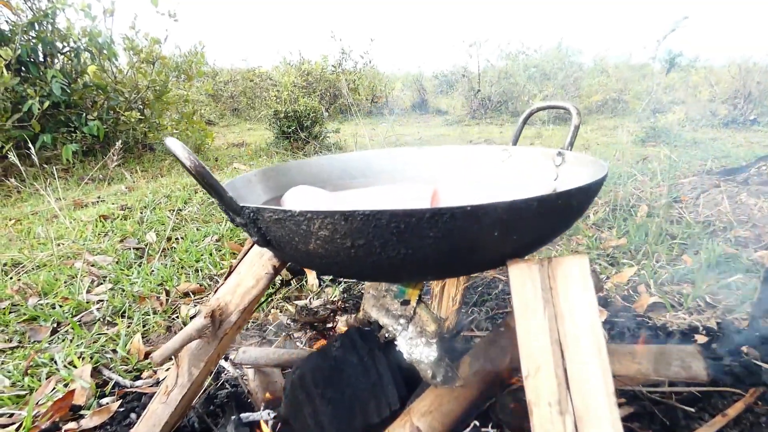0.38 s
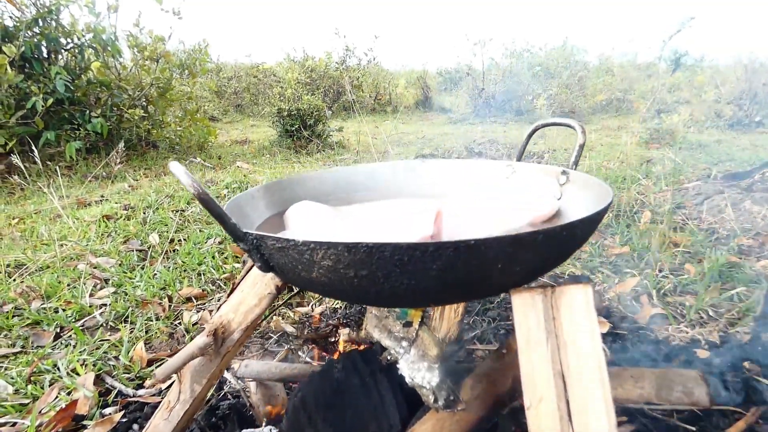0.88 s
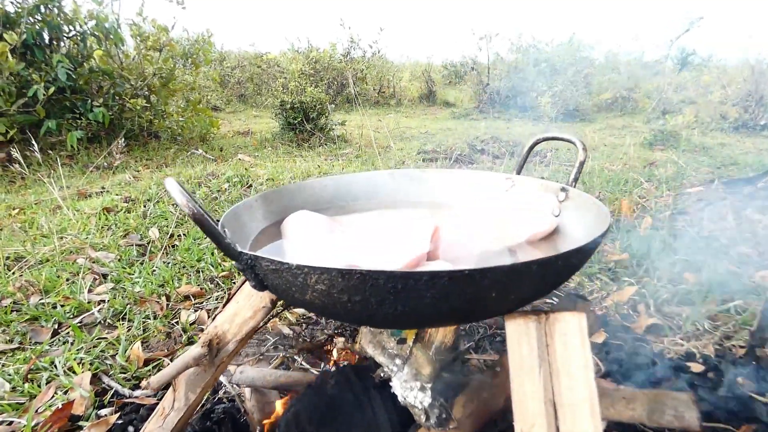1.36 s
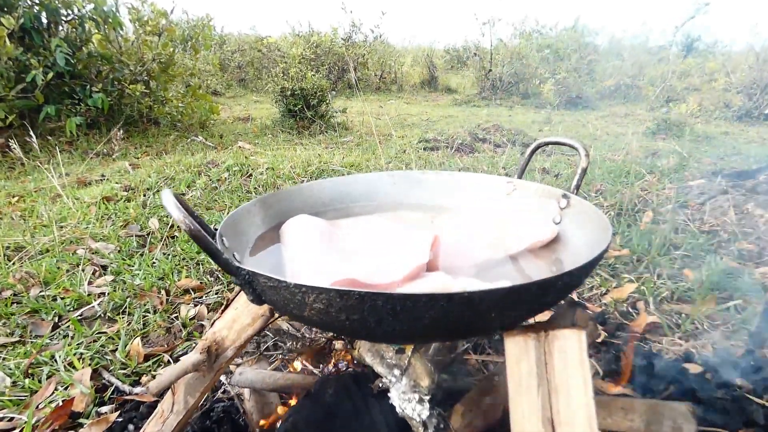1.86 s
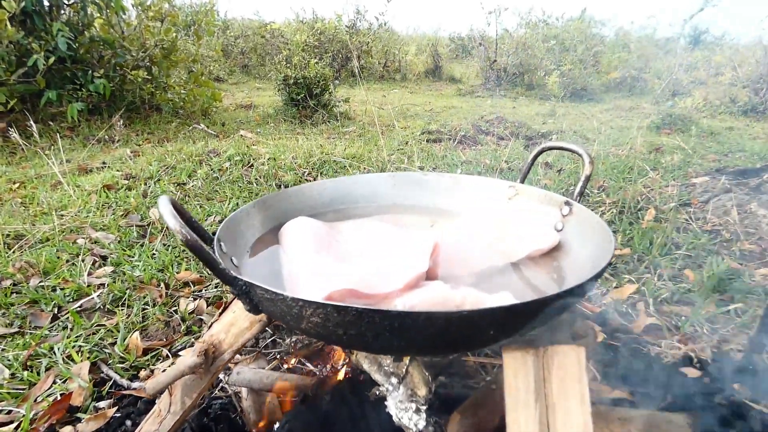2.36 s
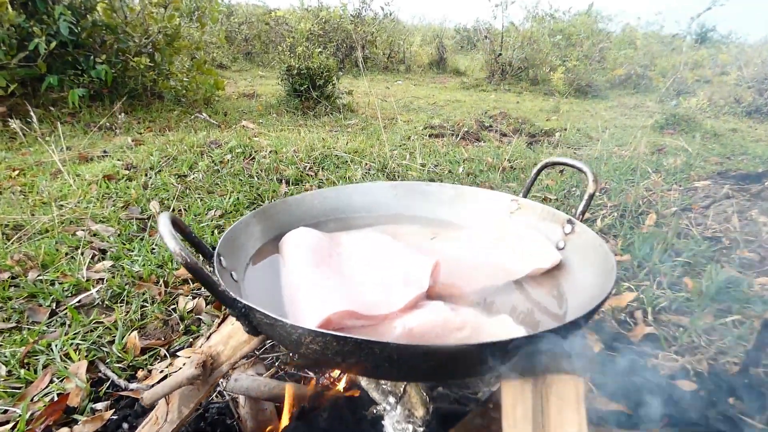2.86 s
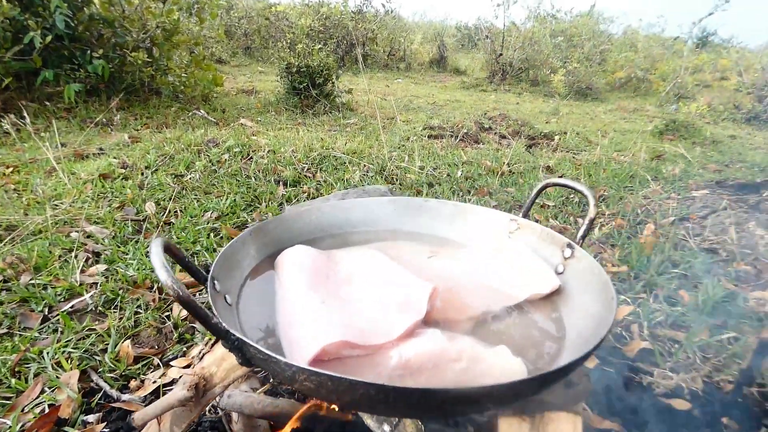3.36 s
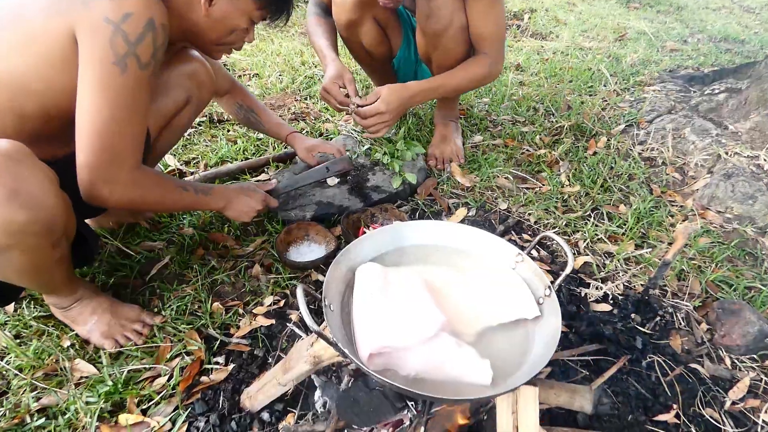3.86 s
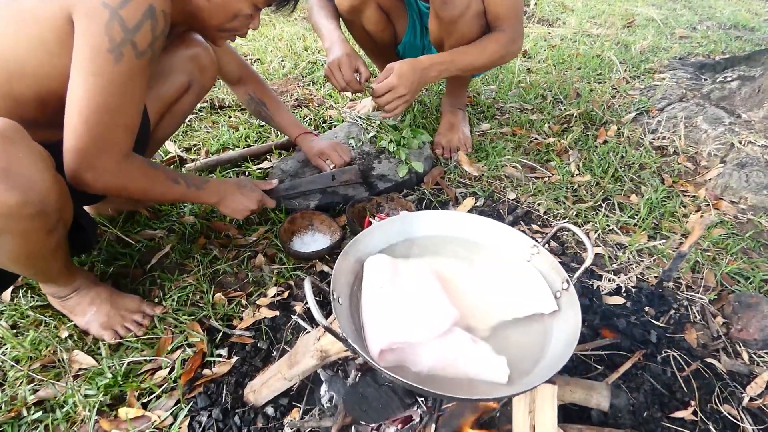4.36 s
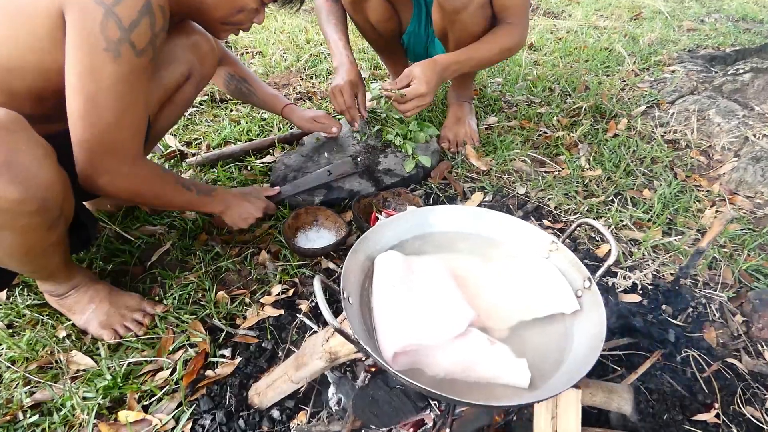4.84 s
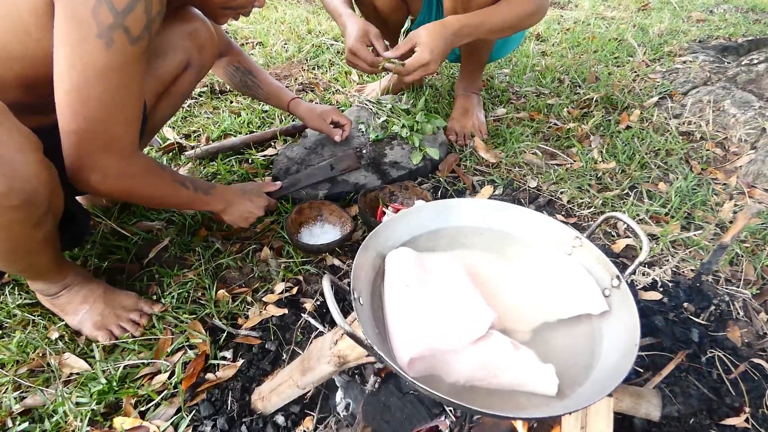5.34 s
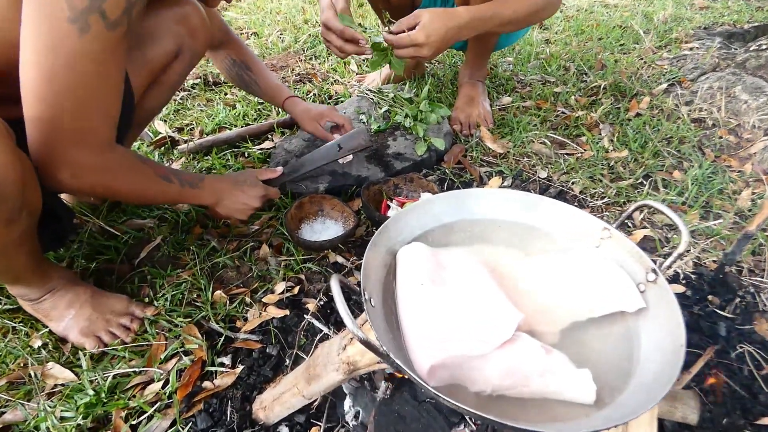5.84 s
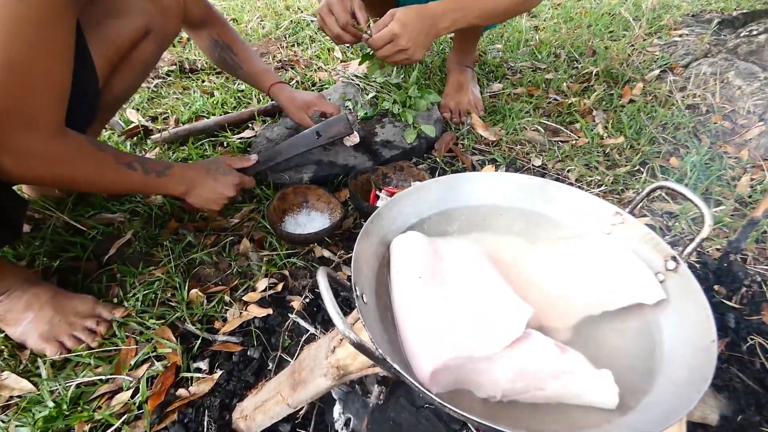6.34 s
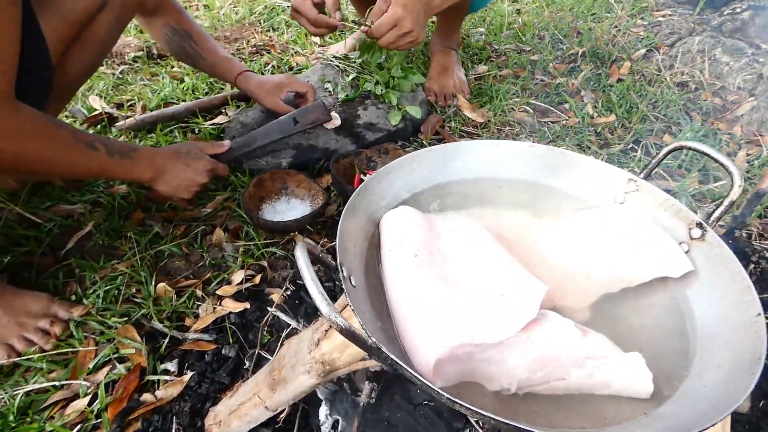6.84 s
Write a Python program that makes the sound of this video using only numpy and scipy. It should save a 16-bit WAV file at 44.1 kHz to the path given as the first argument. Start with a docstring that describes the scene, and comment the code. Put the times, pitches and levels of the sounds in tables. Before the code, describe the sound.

From 0 to 3.5 s a wood fire hisses softly outdoors, sprinkled with tiny crackles over low rumble. Thin bright snaps come at 0.6 and 0.7 s, a hollow knock at 1.3 s, the strongest woody crack at 1.55 s, another knock at 1.8 s, then small clusters around 2.4 and 3.1 s. A far animal chirrs faintly from 2.5 s. Complete silence lasts from 3.54 to 3.81 s. Then, close and dry, a knife scrapes stone with a faint rising squeal at 3.9 s and gritty strokes to 4.65 s. A hard chop lands at 4.85 s, beside a tiny bird note; a stem squeaks and snaps at 5.1 s. A longer rasp leads to the loudest blow at 5.54 s, its blade ringing briefly; the background ducks, then recovers. Lighter scrapes and ticks continue until about 7.2 s, with throbbing chirrs, a faint distant moan at 6 s and soft blips from 6.3 s.

```python
"""Camp fire, then a knife on stone

A wood fire hisses and pops under a pan in an open field, over a low outdoor rumble and a far chirring animal.
After a short silent cut, closer to a flat stone, a heavy knife is dragged over it, snaps through stems and
once strikes it so that the blade rings. Hiss is shaped noise, knocks and ringing are decaying modes, snaps
are noise bursts, and strokes are grit noise driving resonances; a limiter ducks after loud peaks."""
import sys
import numpy as np
from scipy import signal
from scipy.io import wavfile
from scipy.ndimage import uniform_filter1d, minimum_filter1d

SR = 44100
rng = np.random.default_rng(int(sys.argv[2]) if len(sys.argv) > 2 else 0)


def nominal_scale(level):
    """Amplitude ratio for a level in decibels (scalar or array-like)."""
    x = np.asarray(level, float) / 20
    return 10 ** x


def log_audio(samples):
    """Write samples as a 16-bit WAV file to the path given in sys.argv[1]."""
    # one column per channel
    frames = np.atleast_2d(samples).T
    # limit to full scale, then quantise
    limited = np.clip(frames, -1, 1)
    pcm = np.round(limited * 32767).astype(np.int16)
    wavfile.write(sys.argv[1], SR, pcm)


N = 317961

# silence between the two shots: start_s, end_s
CUT = (3.541, 3.811)


def evened(x):
    """Normalisation: scales a signal to rms 1."""
    return x / np.sqrt(np.mean(x ** 2) + 1e-20)


def read(points, hz):
    """Spectral interpolation: reads a curve on a log-frequency axis."""
    f, value = np.transpose(points)
    return np.interp(np.log(hz + 1), np.log(f + 1), value)


def add(mix, s, sound, pan_db):
    """Intensity stereo: a level difference (left minus right) places a mono sound."""
    part = mix[:, round(s * SR):][:, :len(sound)]
    part += nominal_scale(np.array([[pan_db], [-pan_db]]) / 2) * sound[:part.shape[1]]


def resonate(x, hz, width):
    """Heterodyning: shifts the curve hz to zero, smooths and shifts back, a resonance of gain 1."""
    turn = np.exp(2j * np.pi * np.cumsum(hz * np.ones(len(x))) / SR)
    r = np.exp(-np.pi * abs(width) / SR)
    return 2 * (turn * signal.lfilter([1 - r], [1, -r], x / turn)).real


def ring(modes, seconds, rise):
    """Modal decay: dying sines start nearly together after a blow that builds up over rise seconds, peak 1."""
    t = np.arange(round(seconds * SR)) / SR
    x = 0
    for hz, db, t60 in modes:
        x = x + nominal_scale(db - 60 * t / t60) * np.sin(2 * np.pi * (hz * t + 0.36 * rng.random()))
    x *= 1 - np.exp(-t / rise)
    return x / abs(x).max()


def crack(hz, t60, wide_db, tail_db):
    """Impulsive fracture: a noise snap near hz over a wide band, with fainter scatter from the ground, peak 1."""
    t, noise = np.arange(4000) / SR, rng.standard_normal(4000)
    decay = nominal_scale(-60 * t / max(t60, .004)) + nominal_scale(tail_db - 60 * t / 0.23)
    shape = (1 - np.exp(-t / 0.0001)) * decay
    narrow = resonate(resonate(noise, hz, .4 * hz), hz, .4 * hz)
    wide = resonate(resonate(noise, 4700, 17000), 6300, 16000)
    wide = signal.lfilter([1, -1], [1, -.85], wide)  # thin below 1 kHz
    x = shape * (evened(narrow) + nominal_scale(wide_db) * evened(wide))
    return x / abs(x).max()


def nearness(hz, centre_hz, spread):
    """Selective excitation: how strongly a contact that favours centre_hz drives a mode at hz."""
    return np.exp(-.5 * (np.log(hz / centre_hz) / spread) ** 2)


def sweep(start, end, from_hz, to_hz):
    """Linear glide: the times of a short sound and its straight course in pitch."""
    t = np.arange(start, end, 1 / SR)
    return t, np.linspace(from_hz, to_hz, len(t))


def air():
    """Stochastic spectra: random short-time spectra with drifting patches make hiss and lumpy rumble."""
    # relative hiss spectrum of each shot: freq_hz, density_db
    fire_hiss = [(290, -14), (500, -24.5), (631, -1.5), (784, -3.5), (974, -15.5), (1180, -5.5),
                 (1300, -3.5), (1870, -7), (2770, -3.5), (3700, -6.5), (4800, -3), (7420, -9.5),
                 (9490, -6.5), (11300, -6.5), (12300, -14), (14900, -17.5), (16000, -34)]
    stone_hiss = [(290, -36), (500, -10.5), (708, -7), (868, -11.5), (1130, -15), (1440, -5), (1740, -15),
                  (2460, -12), (2770, -15), (3490, -14), (5880, -15.5), (7420, -19.5), (10200, -15),
                  (11400, -11.5), (12300, -23.5), (15000, -29.5), (16000, -36.5)]
    # relative spectrum of the field rumble: freq_hz, density_db
    rumble = [(15, -84), (25, -73.5), (97, -3.5), (152, -2.5), (295, -12.5), (324, -8.5), (620, -19),
              (746, -46.5), (857, -26), (1000, -21), (1300, -50), (2200, -120)]
    # likeness of the two microphones, limited to -1..1: freq_hz, correlation
    likeness = [(60, -0.44), (150, 1), (380, 0.22), (950, -0.37), (2380, 0.61), (5980, 0.87), (15000, 0.48)]
    # balance of the microphones: freq_hz, left_minus_right_db
    balance = [(60, -4.5), (240, 0), (950, -2.5), (3770, 1.5), (15000, -1.5)]
    # each shot: start_s, hiss_db, hiss_drift_db_per_s, rumble_db, rumble_drift_db_per_s
    shots = [(0, -45, -1.39, -47.5, -0.88), (3.811, -49.5, 0.5, -45, -1.13)]
    # the rumble swells once: centre_s, half_width_s, rise_db
    gust = (4.23, 0.21, 2.9)
    frames, hz = N // 256 + 5, np.fft.rfftfreq(1024, 1 / SR)
    t = np.arange(frames) * 256 / SR
    a, b, c, d, patches = rng.standard_normal((frames, 513, 5)).T
    patches = uniform_filter1d(uniform_filter1d(patches, size=10, axis=0), size=12, axis=1)
    patches = evened(patches)
    lumps = evened(uniform_filter1d(rng.standard_normal(frames), size=5))

    second = t >= CUT[0] + .1  # the shots change inside the silence
    top = np.where(second, nominal_scale(read(stone_hiss, hz))[:, None], nominal_scale(read(fire_hiss, hz))[:, None])
    bottom = nominal_scale(read(rumble, hz))[:, None]
    start, hiss_db, hiss_drift, rumble_db, rumble_drift = np.array(shots)[second * 1].T
    hiss_db = hiss_db + hiss_drift * (t - start)
    rumble_db = rumble_db + rumble_drift * (t - start) + lumps
    rumble_db = rumble_db + gust[2] * np.exp(-((t - gust[0]) / gust[1]) ** 2)
    field = nominal_scale(hiss_db) * top / np.linalg.norm(top, axis=0)
    field = field + nominal_scale(rumble_db) * bottom / np.linalg.norm(bottom, axis=0)

    same = np.clip(read(likeness, hz), -1, 1)[:, None]
    left = a + 1j * b
    right = same * left + np.sqrt(1 - same ** 2) * (c + 1j * d)
    z = np.array([left, right]) * field * nominal_scale(1.7 * patches)
    z *= nominal_scale(np.array([.5, -.5])[:, None, None] * read(balance, hz)[:, None])
    unit = np.sqrt(1536 / 4) / 20  # level scale of the short-time spectrum
    return signal.istft(z * unit, nperseg=1024, noverlap=768)[1][:, :N]


def chirr():
    """Amplitude modulation: a far animal's fuzzy narrow note throbs unevenly, different at each microphone."""
    # bouts of chirring, levels before a common gain: start_s, end_s, level_db, pitch_hz
    bouts = [(2.5, 2.797, -67.5, 1350), (3.007, 3.503, -68.5, 1297), (3.754, 4.495, -63, 1443),
             (4.901, 5.605, -66, 1476), (5.81, 6.207, -58.5, 1407), (6.33, 6.6, -61, 1410),
             (6.813, 7.144, -59, 1430)]
    fade_s = 0.075
    t = np.arange(N) / SR
    start, end, db, pitch_hz = np.transpose(bouts)
    level = 0
    for a, b, d in zip(start, end, db):
        level = level + nominal_scale(d) * np.clip(np.minimum(t - a, b - t) / fade_s + .5, 0, 1)
    wander = evened(uniform_filter1d(rng.standard_normal(N), size=3000))
    hz = np.interp(t, (start + end) / 2, pitch_hz) * (1 + 0.0059 * wander)
    throb_hz = 28 * (1 + 0.35 * wander)
    throb = 0.94 + np.cos(np.pi * np.cumsum(throb_hz) / SR) ** 2
    noises = rng.standard_normal((2, N))
    a, b = (evened(throb * resonate(resonate(n, hz, 110), hz, 130)) for n in noises)
    return nominal_scale(2.0) * level * np.array([a + 0.16 * b, a - 1.43 * b])


def moan(mix):
    """Band-filtered noise: a faint dull double band swells briefly in the distance."""
    # one call, pitches of the upper band: start_s, end_s, level_db, from_hz, to_hz
    call = (6, 6.37, -56.5, 821, 955)
    start, end, db, from_hz, to_hz = call
    t, hz = sweep(start, end, from_hz, to_hz)
    noise = rng.standard_normal(20000)[:len(t)]
    upper, lower = (evened(resonate(resonate(noise, f, 91), f, 91)) for f in (hz, 0.607 * hz))
    add(mix, start, nominal_scale(db) * signal.windows.tukey(len(t), .3) * (upper + 0.7 * lower), 0)


def blips(mix):
    """Superposition: each distant blip is two soft tones under one short swell."""
    # onset and level of the upper tone: start_s, level_db
    blip_times = [(6.325, -42), (6.603, -41), (6.641, -43), (6.76, -41), (6.845, -52)]
    high_hz, low_hz, low_db, length_s = 1470, 1000, -5.5, 0.021  # low_db is relative to the upper tone
    t = np.arange(0, length_s, 1 / SR)
    for (s, db), (a, b) in zip(blip_times, rng.random((len(blip_times), 2))):
        high = np.sin(2 * np.pi * (high_hz * t + a))
        low = nominal_scale(low_db) * np.sin(2 * np.pi * (low_hz * t + b))
        add(mix, s, nominal_scale(db) * np.hanning(len(t)) * (high + low), 0)


def bird(mix):
    """Frequency modulation: one short whistle rises quickly and levels off."""
    # one note, level before a 3 dB lift: start_s, end_s, level_db, from_hz, to_hz
    note = (4.808, 4.84, -49, 2450, 2950)
    start, end, db, from_hz, to_hz = note
    t = np.arange(start, end, 1 / SR)
    hz = to_hz + (from_hz - to_hz) * np.exp(-(t - start) / .009)
    swell = np.sin(np.pi * ((t - start) / (end - start)) ** 1.3) ** .5
    add(mix, start, nominal_scale(db + 3) * swell * np.sin(2 * np.pi * np.cumsum(hz) / SR), 0)


def log_knocks(mix):
    """Cavity modes: settling logs knock, and each knock favours the hollow modes near its own pitch."""
    # knocks: time_s, peak_db, favoured_hz, left_minus_right_db
    knocks = [(.772, -43.5, 440, 5), (.95, -43.5, 357, -15), (1.2803, -24, 640, -5),
              (1.5516, -14.5, 700, -5.5), (1.5545, -22, 471, 1), (1.587, -41, 340, -5),
              (1.601, -36, 667, -5), (1.7895, -32.5, 600, -4), (1.852, -41.5, 620, -8),
              (2.169, -41.5, 600, -3), (2.287, -40, 500, -8), (2.417, -36.5, 420, -9),
              (2.428, -45, 600, -9), (2.44, -39, 490, -5), (2.457, -40, 700, -6), (3.131, -35.5, 450, 2),
              (3.137, -36, 340, -20), (3.361, -42, 550, 2), (3.455, -42, 500, 0)]
    # modes of a hollow log: freq_hz, level_db, t60_s
    log_modes = [(340, -11, 0.017), (450, 2, 0.029), (564, 5.5, 0.024), (700, -3, 0.014), (850, 5.5, 0.025),
                 (946, 0.5, 0.027), (1150, -0.5, 0.035), (1750, 2.5, 0.03), (2150, -2.5, 0.034),
                 (2500, -4, 0.036), (2860, -8, 0.033)]
    for s, db, centre_hz, pan_db in knocks:
        modes = []
        for hz, d, t60 in log_modes:
            modes.append((hz, d + 20 * np.log10(0.22 + nearness(hz, centre_hz, 0.29)), t60))
        add(mix, s, nominal_scale(db) * ring(modes, .08, 0.0012), pan_db)


def fire_snaps(mix):
    """Brittle fracture: splitting fibre gives separate snaps over a random rain of faint crackles."""
    # snaps: time_s, peak_db, colour_hz, t60_s, wide_band_db
    pops = [(0.617, -17.5, 10700, 0.0046, 1), (0.7187, -25, 5900, 0.02, -4), (1.281, -42, 1870, 0.017, -1),
            (1.5516, -17.5, 4480, 0.025, -2), (1.562, -28, 5000, .012, 3), (1.567, -30, 5000, .012, 0),
            (1.574, -34, 4000, .012, 10), (2.288, -40, 2000, 0.018, 0), (2.419, -36.5, 1900, 0.03, 4),
            (2.431, -38, 2500, 0.03, 3), (2.442, -38, 2010, 0.044, 1), (2.459, -39, 2500, 0.03, -1),
            (3.1296, -35.5, 3840, .02, -5), (3.131, -40.5, 1600, 0.022, -9), (3.144, -42.5, 1500, .02, 0)]
    for s, db, hz, t60, wide_db in pops:
        add(mix, s, nominal_scale(db) * crack(hz, t60, wide_db, -18.0), -0.9)
    # crackles: colour in Hz, least peak in dB, mean number per second
    for hz, db, per_s in [(600, -58.5, 27), (4460, -51.0, 28), (10000, -46.0, 25)]:
        happens = rng.random(N) < per_s / SR
        size = nominal_scale(db + 2 * np.minimum(rng.exponential(1, N), 4)) * happens
        add(mix, 0, signal.oaconvolve(size, crack(hz, 0.036, -1, -26.5))[:N], 0)


def slab_thuds(mix):
    """Damped low-frequency impact: the slab rocks on the soil."""
    # thuds: time_s, peak_db
    rocks = [(4.321, -31), (4.851, -32.5), (4.951, -34), (5.154, -25), (5.36, -28), (5.541, -27),
             (5.8, -39), (6.771, -43)]
    for s, db in rocks:
        add(mix, s, nominal_scale(db) * crack(400, 0.014, -21.0, -43.0), 0)


def contact_snaps(mix):
    """Impulsive contact: knife taps and snapping stems each give a noise burst."""
    # snaps: time_s, peak_db, colour_hz, wide_band_db, left_minus_right_db
    contacts = [(4.32, -23, 10130, 0.5, -3.5), (4.379, -30.5, 6490, 13.5, 1), (4.85, -4, 2500, 20, -1),
                (5.038, -31, 5900, -2, 0), (5.0785, -33, 5700, -6, -1), (5.079, -37, 3100, -15, 0),
                (5.085, -19.5, 5100, -14, 0), (5.0855, -27, 1200, -23, 0), (5.093, -30, 4800, 0, 0),
                (5.095, -33, 1400, -20, -1), (5.112, -26.5, 1080, -13, 0), (5.112, -33, 2500, -11, 1.5),
                (5.1505, -22, 4000, 7, 1.5), (5.153, -9.5, 4950, 8, 0), (5.359, -16, 4640, 0, 3),
                (6.142, -23, 4300, -2, 2.5), (6.325, -35, 3000, 4, 1.5), (6.815, -27, 900, -12, 0),
                (7.015, -27, 9500, -6, 0), (7.076, -26.5, 4840, 20, 2), (7.173, -33.5, 9600, -15, 1.5)]
    for s, db, hz, wide_db, pan_db in contacts:
        add(mix, s, nominal_scale(db) * crack(hz, 0.019, wide_db, -24.5), pan_db)


def stem_squeak(mix):
    """Gliding resonance: one stem squeaks downward as a dying band of noise."""
    # squeak: level_db, from_hz, to_hz
    glide = [-17.5, 2820, 2150]
    db, from_hz, to_hz = glide
    t = np.arange(2000) / SR
    glide_hz = to_hz + (from_hz - to_hz) * np.exp(-t / 0.008)
    noise = rng.standard_normal(2000)
    band = evened(resonate(resonate(noise, glide_hz, 650), glide_hz, 660))
    add(mix, 5.085, nominal_scale(db - 60 * t / 0.054) * band * (1 - np.exp(-t / 0.0035)), 1)


def hard_chop(mix):
    """Damped modes: the hardest chop rings the blade while it is held down on the stone."""
    # chop: time_s, peak_db
    chop = (4.8503, -7)
    # modes of the held blade: freq_hz, level_db, t60_s
    held_modes = [(1760, -11.5, 0.057), (2506, 7, 0.016), (3740, -3.5, 0.013), (4300, -2.5, 0.015),
                  (4920, 2, 0.011), (5630, 0, 0.012), (6390, -11, 0.11), (7200, 2, 0.025),
                  (7950, -5, 0.046)]
    add(mix, chop[0], nominal_scale(chop[1]) * ring(held_modes, .08, 0.00068), 0.5)


def blow(mix):
    """Free modal vibration: a blow on the stone rings the blade, with a first touch and a snap."""
    # levels of the blow: ring_db, snap_db, first_touch_db
    levels = (-1.7, -2, -14.5)
    # modes of the struck blade, levels relative to ring_db: freq_hz, level_db, t60_s
    blade_modes = [(880, -22, 0.02), (1400, -16, 0.018), (1767, -11.5, 0.075), (2550, -12, 0.01),
                   (3038, -9, 0.06), (3174, -3, 0.048), (2900, -8, 0.007), (4239, -12, 0.045),
                   (4310, -19, 0.04), (5204, -12, 0.095), (5330, -16, 0.035), (5650, -21, 0.03),
                   (6584, -20, 0.06), (6450, -27, 0.025), (8900, -28, 0.017)]
    (db, snap_db, touch_db), s, pan_db = levels, 5.5426, 4.5
    add(mix, s - .002, nominal_scale(touch_db) * crack(4600, 0.061, 0, -35), pan_db)  # the tip lands first
    for mode in blade_modes:  # the lower modes radiate further to the left
        add(mix, s, nominal_scale(db + mode[1]) * ring([mode], 0.22, 0.0001), pan_db * 3000 / mode[0])
    add(mix, s, nominal_scale(snap_db) * crack(5800, 0.0078, -0.62, -27.0), pan_db)


def squeal(mix):
    """Friction-driven resonance: a narrow noise band rises as the free length of the edge shortens."""
    # one squeal, width of one filter pass: start_s, end_s, level_db, from_hz, to_hz, width_hz
    rise = (3.915, 4.015, -44, 5300, 5950, 260)
    start, end, db, from_hz, to_hz, width_hz = rise
    t, hz = sweep(start, end, from_hz, to_hz)
    noise = rng.standard_normal(8000)[:len(t)]
    band = resonate(resonate(noise, hz, width_hz), hz, width_hz)
    add(mix, start, nominal_scale(db) * signal.windows.tukey(len(t), .7) * evened(band), 0)


def stroke(mix, start, firm_s, end, firm_db, sing_db):
    """Frictional excitation: dense grit drives a patchy rasp and the edge and slab modes near the contact."""
    # steel on stone, relative spectrum: freq_hz, density_db
    rasp_colour = [(880, -48), (1500, 1.5), (2910, -2), (3280, 1), (3550, -2.5), (4460, -0.5),
                   (10700, -2.5), (12500, -6), (14500, -7), (16000, -26)]
    # narrow ringing of the dragged edge: freq_hz, width_hz, level_db
    edge_modes = [(3150, 150, -3), (4300, 100, 3), (5230, 99, 8.5), (5540, 130, 0), (5690, 130, 5),
                  (6100, 160, 5.5), (6700, 88, 3), (7300, 130, 6), (7540, 63, 5), (8500, 60, 3),
                  (9200, 130, 8), (9700, 120, 5.5), (10500, 160, 7)]
    # slab under the stroke, width of one filter pass: freq_hz, width_hz, level_db
    slab_modes = [(500, 350, 11), (850, 200, 10), (1150, 320, 9.5), (1385, 160, -1), (1763, 160, 3.5),
                  (2190, 140, -0.5)]
    # where the edge meets the stone, as favoured pitches: time_s, singing_hz, second_singing_hz, dull_rub_hz
    contact = [(3.86, 5260, 6100, 1260), (3.93, 5350, 5830, 1150), (3.96, 5600, 6000, 1150),
               (4.02, 5900, 6700, 1100), (4.22, 7300, 7700, 1000), (4.3, 7300, 9600, 885),
               (4.4, 6800, 9930, 770), (4.52, 7300, 9500, 1040), (4.59, 6500, 8450, 1000),
               (4.64, 7200, 9700, 970), (4.931, 6000, 9000, 620), (5.02, 6050, 9000, 1320),
               (5.25, 8700, 10500, 1230), (5.34, 8500, 10500, 1180), (5.38, 6700, 9000, 1100),
               (5.44, 6900, 9700, 1010), (5.68, 7960, 9900, 1110), (5.82, 7400, 10000, 850),
               (5.93, 7400, 9000, 820), (6.03, 7100, 9000, 500), (6.14, 6950, 9300, 800),
               (6.31, 4800, 9400, 895), (6.38, 5300, 9500, 1100), (6.43, 6100, 5230, 1420),
               (6.5, 6300, 9200, 1330), (6.56, 6030, 7300, 2150), (6.63, 6800, 7300, 1300),
               (6.82, 8500, 3280, 930), (6.95, 8500, 4830, 805), (7.07, 8500, 9900, 850),
               (7.15, 8500, 9900, 770)]
    t = np.arange(start, end, 1 / SR)
    # higher powers: flatter top, more sudden end
    before = abs((firm_s - t) / (firm_s - start)) ** 2.66
    after = abs((t - firm_s) / (end - firm_s)) ** 2.68
    db = firm_db - 27 * np.where(t < firm_s, before, after)
    rub_db = -3.5 - 0.14 * (db + 38.5)  # relative to the pressure level, weaker as pressure grows
    s, *pitches = np.transpose(contact)
    edge_hz, second_hz, slab_hz = (np.interp(t, s, hz) for hz in pitches)
    bend = (edge_hz / edge_hz.mean()) ** 0.08

    fine, coarse = rng.standard_normal((2, 20000))
    grit = fine * nominal_scale(2.2 * evened(uniform_filter1d(coarse, size=60)))
    drive = grit[:len(t)]

    bins, frames, z = signal.stft(grit, SR, nperseg=256, noverlap=192)
    patches = uniform_filter1d(rng.standard_normal(z.shape), size=3, axis=0)
    patches = evened(uniform_filter1d(patches, size=30, axis=1))
    # treble follows the contact
    corner_hz = 1.83 * np.interp(frames + t[0], t, (edge_hz + second_hz) / 2)
    dull = 1 / (1 + (bins[:, None] / corner_hz) ** 4)
    z = z * dull * nominal_scale(read(rasp_colour, bins)[:, None] + 1.9 * patches)
    rasp = evened(signal.istft(z, SR, nperseg=256, noverlap=192)[1][:len(t)])

    edge = 0
    for hz, width, d in edge_modes:
        near = 0.25 * nearness(hz, edge_hz, 0.4) + nearness(hz, edge_hz, 0.073)
        near = near + 1.6 * nearness(hz, second_hz, 0.033)
        edge = edge + nominal_scale(d) * near * evened(resonate(drive, hz * bend, width))
    # the free length of the edge slides with the contact
    sliding = evened(resonate(resonate(drive, edge_hz, 330), edge_hz, 330))
    edge = evened(evened(edge) + 0.4 * sliding)

    slab = 0
    for hz, width, d in slab_modes:
        mode = evened(resonate(resonate(grit, hz, width), hz, width))[:len(t)]
        slab = slab + nominal_scale(d) * (0.52 + nearness(hz, slab_hz, 0.15)) * mode
    slab = evened(slab + 1.3 * evened(resonate(drive, slab_hz, 260)))

    sound = 0.85 * rasp + nominal_scale(sing_db) * edge + nominal_scale(rub_db) * slab
    add(mix, t[0], nominal_scale(db) * signal.windows.tukey(len(t), .15) * sound, 0)


def ground(x):
    """Early reflection: bounces off grass and stone differ at each microphone; extreme treble is lost."""
    echo = np.zeros((2, 900))
    np.put_along_axis(echo, rng.integers(20, 900, (2, 14)), rng.choice([-1., 1.], (2, 14)), 1)
    echo *= nominal_scale(-60 * np.arange(900) / SR / 0.028)
    echo = echo / np.linalg.norm(echo[0])
    x = x + nominal_scale(-10.0) * signal.oaconvolve(x, echo, axes=1)[:, :N]
    return signal.sosfilt(signal.butter(2, 11500, fs=SR, output="sos"), x)


def scene():
    """Superposition: near sounds bounce off the ground; the air and the far animal surround them."""
    # knife strokes, singing relative to pressure: start_s, firmest_s, end_s, pressure_db, singing_db
    strokes = [(3.84, 3.96, 4.035, -47, 1), (4.2, 4.3, 4.42, -41, -11), (4.5, 4.582, 4.66, -37.5, 0.5),
               (4.86, 4.932, 5.0, -42.5, -20), (4.98, 5.013, 5.09, -52, -11),
               (5.17, 5.396, 5.48, -34.5, -2.5), (5.44, 5.52, 5.56, -47.5, 0.5),
               (5.63, 5.73, 5.83, -40.5, 1.5), (5.915, 5.979, 6.045, -41, -29.5),
               (6.05, 6.127, 6.22, -47.5, -2), (6.29, 6.385, 6.44, -46, 1.5), (6.38, 6.519, 6.655, -35, -2),
               (6.787, 6.885, 6.985, -38, -23), (7.06, 7.105, 7.17, -45.5, -7.5)]
    near = np.zeros((2, N))
    for source in (moan, blips, bird, log_knocks, fire_snaps, slab_thuds,
                   contact_snaps, stem_squeak, hard_chop, blow, squeal):
        source(near)
    for row in strokes:
        stroke(near, *row)
    return ground(near) + air() + chirr()


def roll_off(x):
    """The treble ends steeply here."""
    return signal.sosfilt(signal.butter(12, 15900, fs=SR, output="sos"), x)


def record(dry):
    """Dynamic range compression: the limiter sinks after an overload, holds and recovers; a cut is silent."""
    # microphone bass cut
    dry = signal.sosfilt(signal.butter(2, 70, "high", fs=SR, output="sos"), dry)
    # highest peak of the last 2400 samples
    peak = -minimum_filter1d(-abs(dry).max(0), size=2400, origin=1199)
    peak_db = 20 * np.log10(peak + 1e-9)
    fall_db = np.arange(N) * 53.0 / SR  # the held peak level falls 53 dB a second
    held_db = np.maximum.accumulate(np.minimum(peak_db, 0) + fall_db) - fall_db
    over_db = np.maximum(held_db + 9.0, 0)  # threshold -9 dB of full scale
    lag = np.exp(-1 / (0.013 * SR))  # 13 ms smoothing
    cut_db = 1.52 * signal.lfilter([1 - lag], [1, -lag], over_db)
    limited = np.clip(dry / nominal_scale(cut_db), -1, 1)
    limited = signal.oaconvolve(limited, signal.firwin(201, 16400, fs=SR)[None], "same")  # band limit
    t = np.arange(N) / SR
    return roll_off(limited * ((t < CUT[0]) | (t > CUT[1])))


dry = scene()
out = record(dry)
log_audio(out)
```